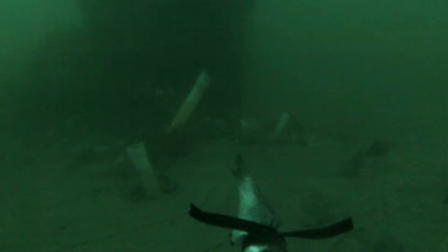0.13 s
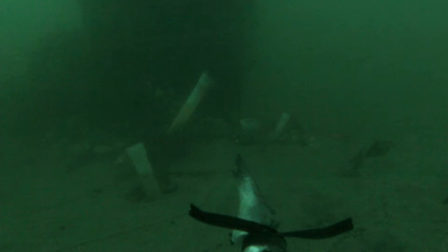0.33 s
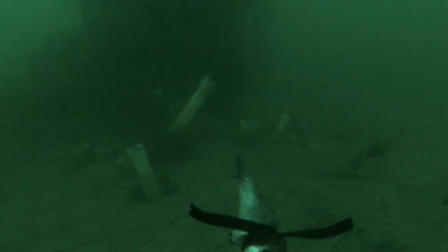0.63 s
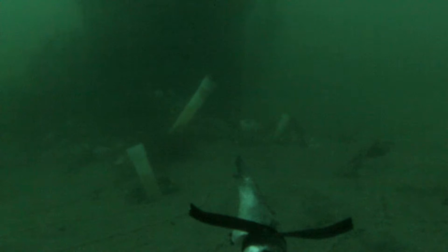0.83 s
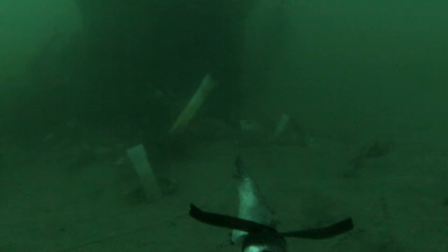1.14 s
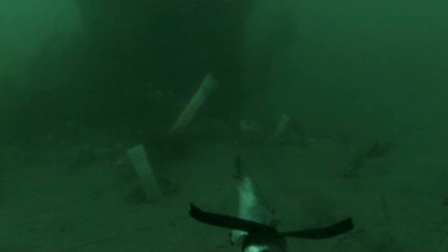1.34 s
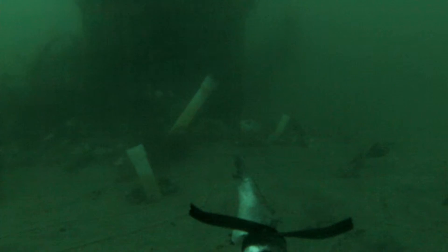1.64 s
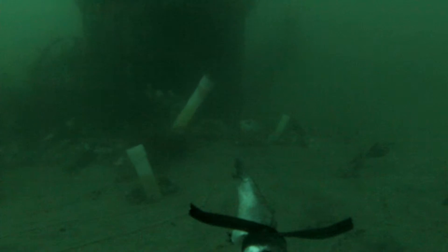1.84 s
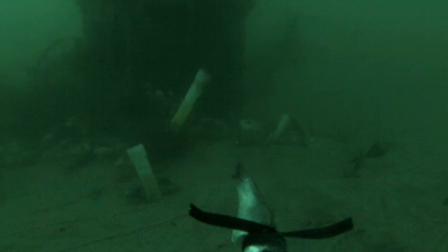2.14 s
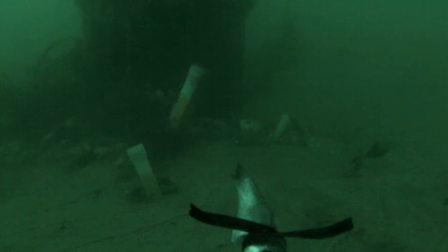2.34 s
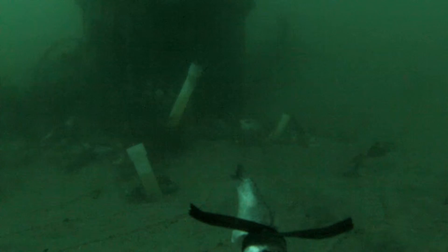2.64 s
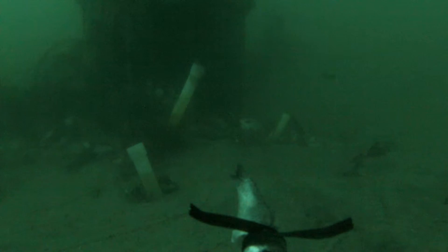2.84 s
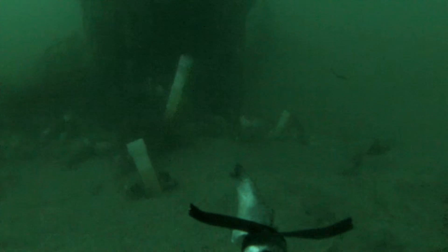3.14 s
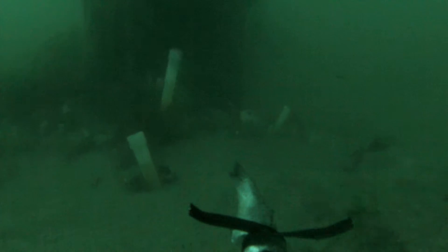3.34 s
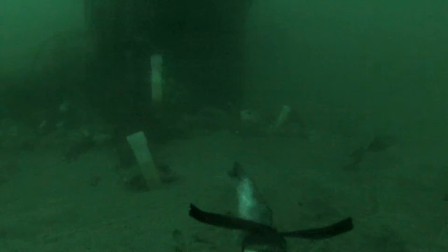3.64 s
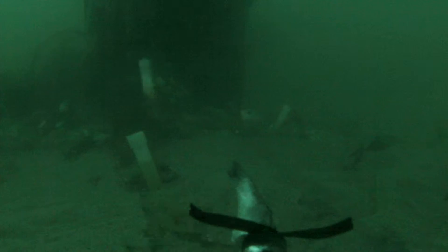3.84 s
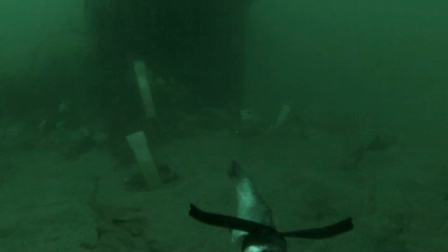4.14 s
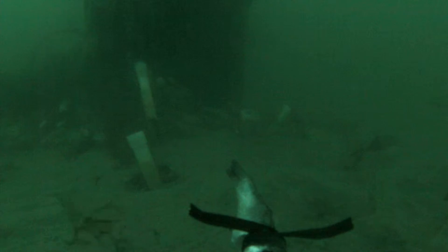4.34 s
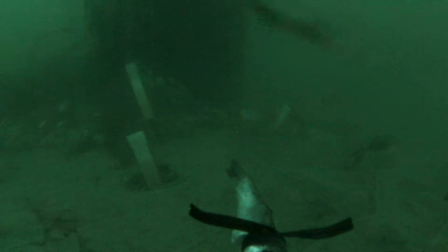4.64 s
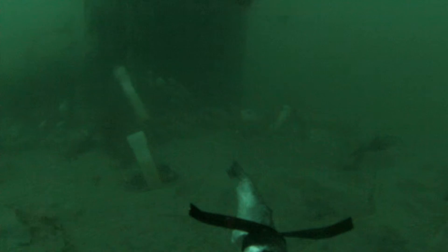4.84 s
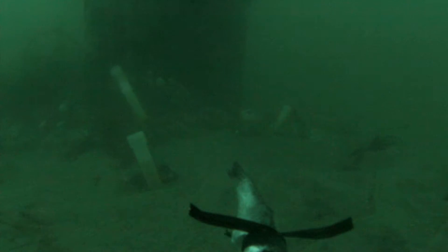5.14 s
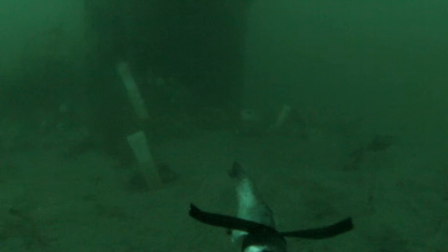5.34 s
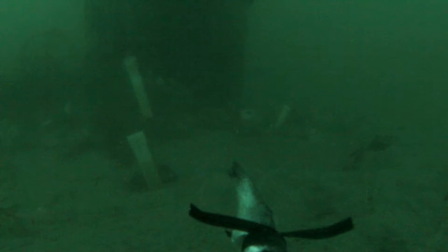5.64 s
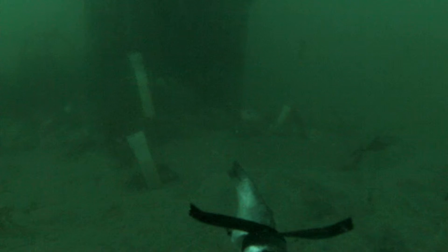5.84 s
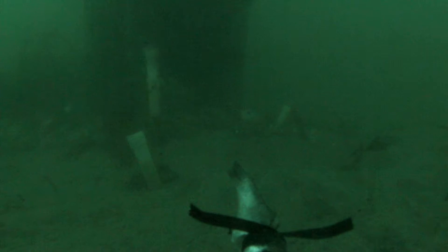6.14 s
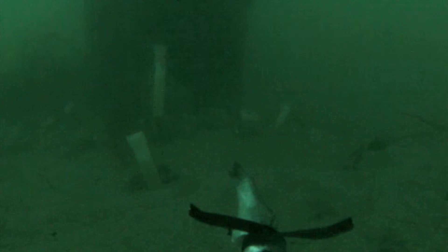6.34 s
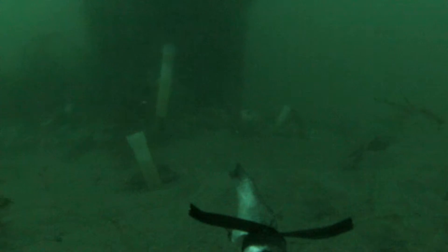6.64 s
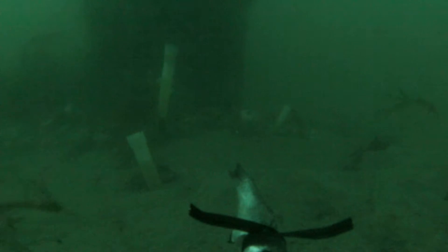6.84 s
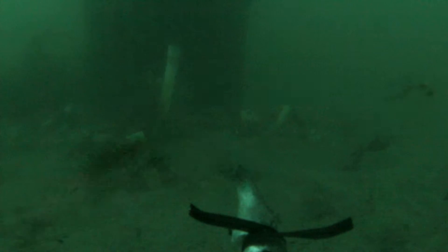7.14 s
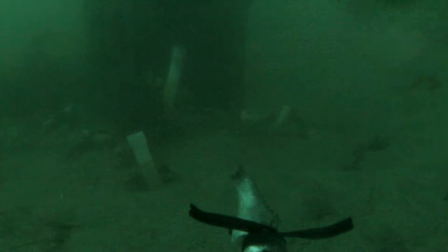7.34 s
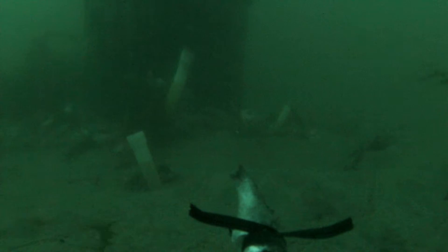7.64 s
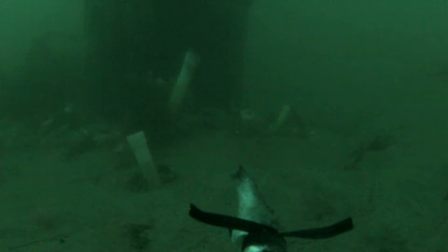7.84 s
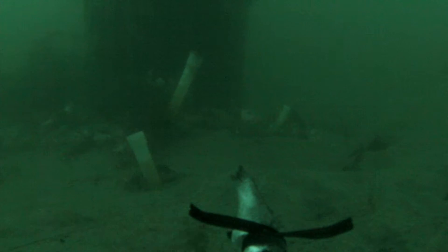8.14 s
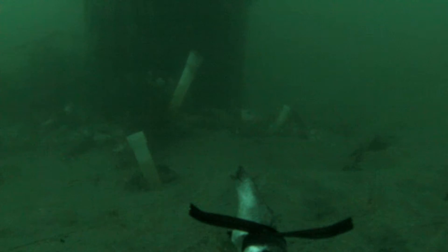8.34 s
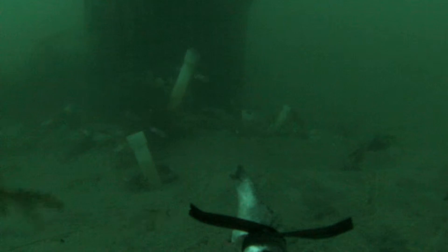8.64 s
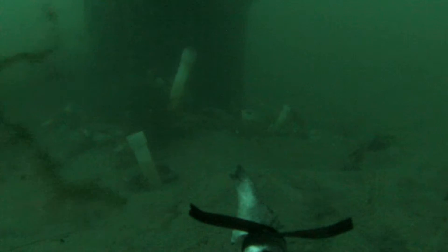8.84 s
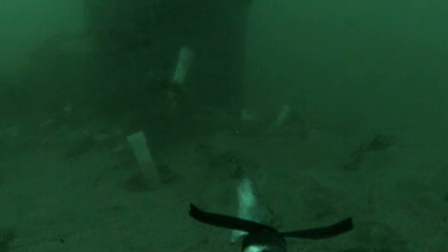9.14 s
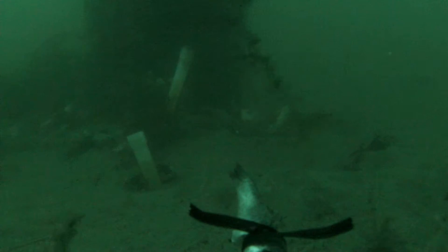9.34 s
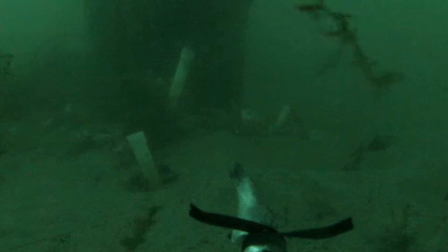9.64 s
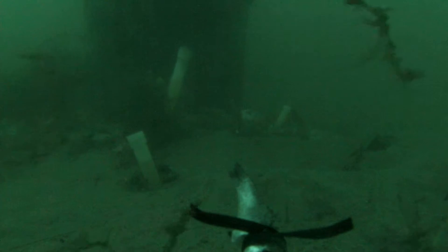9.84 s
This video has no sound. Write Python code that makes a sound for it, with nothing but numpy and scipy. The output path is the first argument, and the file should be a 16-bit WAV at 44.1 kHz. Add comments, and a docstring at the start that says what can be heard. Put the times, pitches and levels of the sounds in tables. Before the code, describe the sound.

Muffled, fluttering water surges round a pier piling beneath constant dry crackling snaps, with heavy low slaps, brief faint buzzes and occasional taps close by.

```python
"""On the sandy bed beside a pier piling, an underwater microphone (hydrophone) listens.
Water churns round the pier as a dull, throbbing rush, built from thousands of tiny pops; it swells with the surge.
Snapping shrimp crackle all around: short bursts that ring at a few pitches and trail off in echoes.
Something taps and scuffs the frame (ringing modes, puffs of noise), and the mount shudders (a wavering low tone).
A faint buzz, perhaps a fish, comes three times: a stack of harmonics. Rumble, drone and hiss lie beneath (noise)."""
import sys
import numpy as np
from scipy import signal
from scipy.fft import rfft, irfft
from scipy.io import wavfile
from scipy.ndimage import uniform_filter1d

SR = 44100
rng = np.random.default_rng(int(sys.argv[2]) if len(sys.argv) > 2 else 0)


def waveform_to_disk(signal):
    """Save audio, clipped to [-1, 1], as 16-bit WAV at the path in sys.argv[1]."""
    frames = np.transpose(np.atleast_2d(signal))
    scaled = np.clip(frames, -1, 1) * 32767
    samples = np.round(scaled).astype(np.int16)
    wavfile.write(sys.argv[1], SR, samples)


N = 440106
TIME = np.arange(N) / SR   # seconds

# Spectra and mode lists set the colour only: their levels are relative.
# colour of the broad rush and of its slaps: f/Hz, level/dB
RUSH_COLOUR = [(60, -39), (95, -22), (135, -14.5), (180, -12.5), (250, -5.5), (360, 2.5), (460, -2),
               (660, -2.5), (780, -9), (880, -18), (1000, -28), (1150, -41.5), (1500, -44), (3000, -114)]
# what a snap rings in the hydrophone: f/Hz, width/Hz, level/dB
SNAP_BODY_MODES = [(1810, 128, -9), (2145, 58, -6.5), (2560, 395, -6.5), (3084, 510, 2), (3310, 650, -1)]
# what a snap rings in the hydrophone's upper range: f/Hz, width/Hz, level/dB
SNAP_TREBLE_MODES = [(4590, 270, -4.5), (5730, 500, -4), (6400, 250, -2), (7970, 630, 0.5),
                     (10840, 850, -7), (12400, 1800, -14.5), (14700, 1200, -24)]


def water(surge_db):
    """Churning water, with separate slaps among it."""
    return churning(surge_db) + slaps(surge_db)


def churning(surge_db):
    """Countless dull pressure pops, bunched into an uneven throb, make the rush; each wave makes them boom."""
    # a hollow boom wells up with each wave: crest t/s, level/dB before trim, hold/s, fall/(dB per s)
    wave_list = [(1.33, -27, 0.11, 42), (3.27, -30, 0.26, 28), (4.87, -27.5, 0.34, 20),
                 (6.823, -29, 0.13, 9), (9.522, -28, 0.23, 80)]
    # the hollow resonance: f/Hz, level/dB
    boom_colour = [(100, -35.5), (180, -26), (228, -11.5), (246, -6), (260, 1), (278, -7), (330, -2.5),
                   (400, -16.5), (600, -43.5), (1000, -65)]
    throb_hz, throb_db = 14.5, 1.92
    boom_rest_db = -13   # between waves, against the surge level
    boom_rise_s = 0.34

    beats = np.cumsum(throb_hz * (1 + 0.2112 * drift(4.38))) / SR
    throb = from_db(throb_db * np.sin(2 * np.pi * beats) + 1.8 * drift(92))
    pops = grains(per_s=3600, spread_db=3.0, top_db=9.5) * throb

    waves = sum(from_db(db - 7.5) * swell(s, boom_rise_s, hold, fall) for s, db, hold, fall in wave_list)
    boom_level = np.hypot(waves, from_db(surge_db + boom_rest_db))
    boom = boom_level * rms_one(through(pops, pulse(boom_colour)))
    rush = from_db(surge_db + 1) * rms_one(through(pops, pulse(RUSH_COLOUR)))
    return boom + rush


def slaps(surge_db):
    """Each slap of water is one compact pulse in the colour of the rush."""
    # the heaviest slaps: t/s, level/dB before trim
    heavy_list = [(1.532, -23), (1.712, -9), (1.733, -10), (1.8385, -7), (1.864, -8.5), (1.980, -8.5),
                  (2.665, -17.5), (3.508, -8.5), (3.576, -7.5), (3.599, -6.5), (3.686, -18), (4.33, -15),
                  (4.393, -11), (4.462, -7), (4.579, -11.5), (4.642, -10), (5.421, -10), (5.503, -9),
                  (5.563, -7.5), (5.763, -7.5), (5.912, -12), (5.985, -10), (6.063, -9.5), (7.127, -8),
                  (7.291, -12.5), (7.989, -28), (9.141, -16)]
    lap_top_db = 13   # highest peak of the lighter slaps, against the surge level
    s, level_db = np.transpose(heavy_list)
    heavy = strikes(s, level_db - 7.0, delay=0.00021)
    # a negative spread makes sizes fall below the top instead of rising above a floor
    light = from_db(surge_db + lap_top_db) * grains(per_s=4, spread_db=-1.0, top_db=2)
    return through(heavy + light, pulse(RUSH_COLOUR))


def shrimp():
    """The whole colony; shallow water carries little of a snap below its cut-off."""
    body, treble = near_shrimp() + neighbour_shrimp() + far_shrimp()
    body = cut(cut(body, 1580, "high", order=14), 4890, "low", order=6)
    return body + cut(treble, 3750, "high")


def near_shrimp():
    """Loud claw snaps, some dry and some smeared by echoes, each coloured its own way: body and treble."""
    # t/s, body level/dB and treble level/dB and echo share/dB (all before trim),
    # body tilt/(dB per octave), pitch/Hz
    snap_list = [(0.063, -55, -45.5, 0, 3, 3850), (0.1454, -41.5, -48, -3, -3, 3850),
                 (0.1954, -29, -40.5, -4, 0, 2450), (0.29, -37.5, -60, -4, -8, 3600),
                 (0.304, -35, -48, -1, 0, 2950), (0.3909, -33, -41, -5, 0, 1850),
                 (0.3984, -42, -54, 7, 0, 2650), (0.4466, -36, -54, 3, -12, 2510),
                 (0.4774, -35, -53, -3, 0, 3800), (0.544, -38.5, -52, -5, 2, 3850),
                 (0.606, -39.5, -49, -5, -5, 3850), (0.6291, -25, -39.5, -18, 11, 2650),
                 (0.8338, -44.5, -42, -7, 3, 3850), (1.0113, -40.5, -56, 1, 0, 3850),
                 (1.1633, -43.5, -62, 4, -9, 3350), (1.1943, -39.5, -66, -3, -5, 3850),
                 (1.244, -59, -47, -12, -3, 3850), (1.2692, -34.5, -55, 0, 1, 3850),
                 (1.2971, -40, -58, 0, -5, 2250), (1.34, -40.5, -40.5, -4, 2, 3850),
                 (1.565, -40.5, -67, -11, 1, 2750), (1.592, -38.5, -54, -5, -6, 2250),
                 (1.62, -32, -43.5, -8, 1, 3600), (1.654, -39, -57, 7, -8, 3850),
                 (1.6854, -37.5, -51, -7, 3, 2500), (1.695, -45, -50, 11, 3, 1900),
                 (1.74, -45, -48, -14, 0, 3850), (1.8764, -46, -47, -2, 3, 3750),
                 (1.952, -39, -50, -9, 2, 2300), (2.237, -33.5, -69, -3.5, -5, 3040),
                 (2.3359, -27, -57, -6, -7, 3100), (2.4067, -41.5, -47, -11, 3, 3870),
                 (2.467, -35.5, -53, 0, -7, 2850), (2.5296, -39, -58, -3, 11, 3280),
                 (2.609, -36, -52, 0, -3, 2200), (2.6651, -44, -58, -4, 0, 2450),
                 (2.7464, -43.0, -59, -4, -11, 3050), (2.7666, -30.5, -48, -6, -7, 3050),
                 (2.7845, -33, -43, -1, -8, 2450), (2.8762, -31.5, -54, -11, -2, 3100),
                 (2.893, -41, -51, -2, -9, 2300), (3.0244, -27.5, -44, -5, -3, 3730),
                 (3.0805, -37.5, -53, 1, -6, 3300), (3.2419, -40.5, -64, -6, 3, 2650),
                 (3.2535, -46, -48, -17, 6, 3850), (3.3366, -36.5, -49, -7, -6, 3850),
                 (3.3826, -43.5, -66, -10, 6, 3250), (3.402, -46, -52, -5, 6, 2550),
                 (3.4359, -44, -53, -2, -1, 3850), (3.486, -38, -50, -10, -11, 2770),
                 (3.5148, -43.0, -65, -4, -7, 3750), (3.541, -45, -56, -2, 0, 2600),
                 (3.548, -43, -52, -7, 6, 2550), (3.5916, -26, -40, -5, -4, 3880),
                 (3.6024, -28, -45, -21, -5, 3850), (3.6412, -37, -66, -8, 2, 1900),
                 (3.928, -40, -46, -7, -10, 3850), (3.9374, -34, -42.5, -3, 1, 2060),
                 (4.125, -36.5, -50, -11, -9, 3850), (4.1642, -41, -51, -8, 0, 3800),
                 (4.1817, -36, -54, 3, -12, 3850), (4.2003, -42, -58, -2, 3, 1950),
                 (4.3192, -30.5, -46, -5, 1, 1800), (4.366, -41, -49, -9, 4, 3850),
                 (4.4183, -41, -50, -11, 3, 1900), (4.44, -49.5, -43, -20, -3, 2850),
                 (4.481, -39.5, -63, -4, 3, 3850), (4.499, -40.5, -45.5, 4, 12, 2400),
                 (4.538, -34, -62, -9, -9, 2700), (4.578, -40.5, -51, -2, -8, 3100),
                 (4.7106, -46.5, -52, -14, 0, 2900), (4.7417, -37.5, -41.5, -11, 9, 3850),
                 (4.7686, -39, -51, 1, -2, 2250), (4.796, -40.5, -44.5, 1, 6, 3850),
                 (4.8847, -40, -61, 0, -6, 2800), (4.925, -32.5, -49, -3, 1, 2000),
                 (4.955, -41, -50, -4, 9, 2550), (4.992, -36, -44, -10, 3, 3850),
                 (5.0046, -28.5, -43, -8, 0, 2210), (5.014, -48, -53, -10, -9, 3850),
                 (5.0978, -37.5, -56, -3, 0, 2600), (5.405, -44, -46, -7, 0, 2750),
                 (5.471, -36.5, -47, -5, 7, 2500), (5.545, -40.5, -45, 5, -7, 3500),
                 (5.5676, -27.5, -47, 1, -9, 2350), (5.6923, -40, -46, -7, 0, 2150),
                 (5.7262, -32.5, -46, -7, 1, 3650), (5.7987, -42.5, -59, -4, -7, 3850),
                 (6.004, -42, -57, 1, 0, 1900), (6.0314, -36.5, -53, -3, 13, 2530),
                 (6.111, -41.5, -58, -8, -5, 2350), (6.1225, -30, -36.5, -23, 0, 3100),
                 (6.1307, -39, -51, 0, 3, 3800), (6.139, -35, -52, 0, 0, 3800),
                 (6.3126, -42, -56, 1, -5, 3050), (6.4633, -35.5, -48, 2, -3, 2300),
                 (6.495, -37.5, -52, -5, -6, 2200), (6.6671, -36.5, -61, 0, -12, 2300),
                 (6.6878, -39, -53, 2, -2, 2600), (6.7677, -35.5, -41, 0, 6, 1900),
                 (6.8744, -33, -44.5, 4, -4, 3800), (7.001, -41, -68, -8, -2, 3050),
                 (7.0294, -27, -40, -11, -9, 2230), (7.0675, -45, -46, -1, 3, 2350),
                 (7.1751, -36.5, -52, -12, 8, 3680), (7.194, -47, -64, -4, 3, 2550),
                 (7.218, -40, -53, -8, 11, 3850), (7.2315, -26, -48, -12, -3, 1850),
                 (7.2538, -36, -43, -5, 6, 1850), (7.2606, -40, -55, 6, -6, 3800),
                 (7.3543, -58, -45.5, -13, 6, 2050), (7.406, -49, -55, -5, -15, 1850),
                 (7.548, -33, -55, -6, -8, 3100), (7.6654, -38.5, -60, -14, -10, 2300),
                 (7.685, -46, -47, -4, 0, 3850), (7.6926, -42, -50, -9, -3, 3850),
                 (7.7197, -45, -46, -2, -3, 3850), (7.7502, -33, -46, 5, 4, 1830),
                 (7.7736, -44, -50, -1, 9, 2050), (7.869, -39.5, -68, -6, -3, 3850),
                 (7.9478, -34, -68, -1, -5, 2850), (7.9637, -39.5, -48, -1, 0, 3700),
                 (7.978, -27.5, -33.5, -13, 7, 2750), (7.9871, -43.5, -51, 2, -5, 2150),
                 (8.027, -42, -52, 0, 5, 2750), (8.0739, -41.5, -49, 5, 0, 2700),
                 (8.219, -41.5, -57, -13, 5, 3800), (8.2378, -29.5, -46, -4, 7, 2530),
                 (8.2736, -42.0, -59, -4, 5, 2600), (8.2835, -29, -40.5, -11, -15, 2580),
                 (8.307, -37.5, -50, -6, -5, 3130), (8.3238, -38, -51, 0, -13, 2000),
                 (8.358, -48.5, -49, -2, 9, 2700), (8.5076, -53, -50, -6, 0, 3850),
                 (8.5195, -30, -46, -18, 0, 3070), (8.5733, -44.5, -59, 3, -3, 3700),
                 (8.638, -39, -39, -14, 0, 3630), (8.646, -39, -47, 2, 0, 3750),
                 (8.663, -26.5, -44, -2.5, -7, 2320), (8.8302, -43.0, -60, -4, 0, 2870),
                 (8.9814, -33, -38.5, -5, -4, 1950), (9.013, -38.5, -45, -5, 15, 2350),
                 (9.1595, -44, -55, 3, 6, 2450), (9.1778, -37, -50, -2, -9, 3450),
                 (9.216, -36.5, -49, -3, 6, 3850), (9.5225, -62.5, -50, -1, 3, 2450),
                 (9.531, -46, -40.5, -14, 5, 2450), (9.6086, -38.5, -61, 0, 8, 1950),
                 (9.629, -38.5, -69, 4, -6, 2300), (9.653, -31.5, -45, 0, 0, 3730),
                 (9.6716, -34.5, -52, 7, -3, 2750), (9.7141, -40, -61, -4, 0, 3850),
                 (9.735, -38.5, -58, 7, 3, 2100), (9.8065, -34, -50, 0, -7, 3100),
                 (9.852, -36.5, -61, -4, -15, 1790)]
    s, body_db, treble_db, scatter_db, tilt_db, pitch_hz = np.transpose(snap_list)
    scatter_db, tilt_db = scatter_db[:, None], tilt_db[:, None]
    # tilt of the treble, dB per octave
    sparkle_db = 9.5 * rng.uniform(-2.06, 0.88, (len(s), 1))
    body = impacts(s, body_db + 2.0, SNAP_BODY_MODES, vary_db=1.06, blur=0.00031,
                   echo_db=scatter_db - 1.5, t60=0.054, tilt_db=tilt_db, pitch_hz=pitch_hz, count=265)
    treble = impacts(s + .0003, treble_db + 0.67, SNAP_TREBLE_MODES, vary_db=3.0, blur=0.00052,
                     echo_db=scatter_db - 2.5, t60=0.078, tilt_db=sparkle_db, count=265)
    return np.array([body, treble])


def neighbour_shrimp():
    """Weaker snaps from a little farther off, at random moments, each with a brightness of its own."""
    faintest_body_db, faintest_treble_db = -47.5, -57.5   # treble before each snap's own brightness
    s, db = colony(spread_db=1.5, range_db=10.5, count=190)
    pitch_hz = rng.uniform(2100, 3650, len(s))
    bright_db = 4 * rng.uniform(-0.58, 1.25, len(s))
    sparkle_db = 9.5 * rng.uniform(-1, 1.7, (len(s), 1))
    body = impacts(s, faintest_body_db + db, SNAP_BODY_MODES, vary_db=1.5, blur=0.00018,
                   echo_db=-3.0, t60=0.019, pitch_hz=pitch_hz)
    treble = impacts(s, faintest_treble_db + db + bright_db, SNAP_TREBLE_MODES, vary_db=0.5, blur=0.00043,
                     echo_db=-18, t60=0.028, tilt_db=sparkle_db)
    return np.array([body, treble])


def far_shrimp():
    """Dense faint crackle and fizz, in flurries; the farthest snaps merge into a wash of ringing noise."""
    # before the flurries
    faintest_body_db, faintest_treble_db = -53, -63.5
    wash_body_db, wash_treble_db = -59.5, -70.5
    flurry_db, flurry_rate_hz = 1.4, 2.9   # spread and speed of the level's wander

    s, db = colony(spread_db=3.5, range_db=10.5, count=900)
    body = impacts(s, faintest_body_db + db, SNAP_BODY_MODES, vary_db=0.0, blur=0.00016,
                   echo_db=-4.0, t60=0.026, size=1024)
    s, db = colony(spread_db=4.5, range_db=18.0, count=1100)
    treble = impacts(s, faintest_treble_db + db, SNAP_TREBLE_MODES, vary_db=4.5, blur=0.00041,
                     echo_db=-9.0, t60=0.031, size=512)
    wash = np.array([from_db(wash_body_db) * noise_in(SNAP_BODY_MODES),
                     from_db(wash_treble_db) * noise_in(SNAP_TREBLE_MODES)])
    return (np.array([body, treble]) + wash) * from_db(flurry_db * drift(flurry_rate_hz))


def taps():
    """Light knocks on the hydrophone's frame: hard tick, short rough crack, slow bending modes, falling tail."""
    # t/s, ring level/dB and tick level/dB and echo share/dB (all before trim)
    tap_list = [(4.627, -36.5, -64, -11), (4.8232, -21.5, -47, -10), (5.1628, -25, -48, -13),
                (5.353, -25.5, -58, -9), (7.239, -14.5, -31, -7.5), (7.4126, -16, -31.5, -9.5),
                (7.9275, -11, -25, -12), (8.0038, -36.5, -54, -4)]
    # the frame's low modes: f/Hz, width/Hz, level/dB
    low_modes = [(547, 130, 3.5), (760, 110, 6.5), (934, 43, 2), (1050, 39, 1.5), (1317, 80, 11),
                 (1466, 44, 1.5), (1530, 105, 3), (1710, 350, 9), (2004, 186, 5), (2210, 65, -12),
                 (2520, 450, -2)]
    # its upper modes, which die sooner: f/Hz, width/Hz, level/dB
    mid_modes = [(2270, 460, 0), (2770, 230, -6), (3070, 120, -2), (3670, 590, -8)]
    # its treble modes: f/Hz, width/Hz, level/dB
    high_modes = [(4260, 460, -11), (5900, 240, -6.5), (7900, 300, -22), (11700, 540, -41)]
    s, ring_db, tick_db, scatter_db = np.transpose(tap_list)
    vary_db = 1.2   # how far the mode strengths differ from tap to tap
    low = impacts(s + 0.0008, ring_db - 0.5, low_modes, vary_db, blur=.00001,
                  echo_db=scatter_db[:, None] + 3.5, t60=0.041, size=4096)
    crack = impacts(s + 0.0004, ring_db - 11.5, mid_modes, vary_db, blur=0.00045, echo_db=1.5, t60=0.024)
    tick = impacts(s, tick_db + 5.0, high_modes, vary_db, blur=.0001, echo_db=-11, t60=0.0074)
    # the tail arrives unevenly
    tail = through(strikes(s, ring_db - 16.5, delay=0), chirp()) * from_db(5.5 * drift(300))
    return cut(low, 430, "high", order=2) + crack + tick + tail


def chirp():
    """Bending waves come back along the frame, the high ones first: a sine falls quickly as it dies away."""
    from_hz, to_hz, fall_s = 5200, 1340, .009
    rise_s, decay_db_per_s = 0.0068, 720
    t = TIME[:3000]
    hz = to_hz + (from_hz - to_hz) * np.exp(-t / fall_s)
    tone = np.sin(2 * np.pi * np.cumsum(hz) / SR)
    return tone * np.minimum(t / rise_s, 1) ** 2 * from_db(-decay_db_per_s * t)


def scuffs():
    """Something brushes the frame: a smooth puff of noise that dies away."""
    # crest t/s, level/dB, fall/(dB per s)
    scuff_list = [(4.25, -49.5, 114), (4.602, -54, 200)]
    # f/Hz, level/dB
    scuff_colour = [(900, -27), (1400, -11), (1720, -2), (2000, -9), (2500, -17), (5000, -46)]
    rise_s = 0.0094
    envelope = sum(from_db(db) * swell(s, rise_s, 0, fall) for s, db, fall in scuff_list)
    return envelope * coloured_noise(scuff_colour)


def buzzes():
    """A low pulse train whose pitch climbs briefly and then sags, heard mostly by its upper harmonics."""
    # start t/s, length/s, level/dB before trim, pitch/Hz before scoop and sag, sag/(Hz per s)
    buzz_list = [(2.911, 0.43, -40.5, 57.1, 14.3), (5.405, 0.46, -42, 57.55, 11.3),
                 (7.776, 0.475, -41.5, 56.6, 10.5)]
    # f/Hz, level/dB
    buzz_colour = [(200, -9.5), (500, 11), (700, 1), (850, -9), (950, -3), (1040, -9.5), (1100, -12.5),
                   (1170, -36)]
    scoop_hz, scoop_s = 1.66, 0.033   # each buzz starts this much flat and climbs
    flutter_db = 2       # the harmonics flutter
    phase_spread = 0.61  # radians; the smaller, the more sharply the buzz pulses
    fade_s = 0.058

    out = np.zeros(N)
    waver = 1 + 0.0034 * drift(9.3)
    harmonics = np.arange(4, 22)[:, None]
    flutter = np.array([drift(5.8) for _ in harmonics])
    for start, length, db, hz, sag in buzz_list:
        on = (TIME > start) & (TIME < start + length)
        t = TIME[on] - start
        pitch = (hz - scoop_hz * np.exp(-t / scoop_s) - sag * t) * waver[on]
        phase = 2 * np.pi * np.cumsum(pitch) / SR
        strengths = from_db(at_hz(buzz_colour, harmonics * pitch) + flutter_db * flutter[:, on])
        offsets = phase_spread * rng.standard_normal(harmonics.shape)
        tone = np.sum(strengths * np.sin(harmonics * phase + offsets), axis=0)
        fade = np.minimum(np.minimum(t, length - t) / fade_s, 1)
        out[on] += from_db(db + 4.5) * rms_one(tone) * fade
    return out


def shudder():
    """Jolts set the mount wobbling: a low, unsteady swing that dies away."""
    # crest t/s, level/dB, fall/(dB per s)
    jolt_list = [(.72, -53, 110), (4.248, -41, 400), (4.303, -37.5, 150), (4.408, -44, 190),
                 (4.642, -46, 190), (4.704, -48, 170), (4.83, -41.5, 380), (7.245, -49, 250),
                 (7.95, -48, 130)]
    swing_hz, wander, rise_s = 63, .09, 0.019   # wander is a share of the swing's pitch
    swing = rms_one(np.sin(2 * np.pi * np.cumsum(swing_hz * (1 + wander * drift(11.2))) / SR))
    return swing * sum(from_db(db) * swell(s, rise_s, 0, fall) for s, db, fall in jolt_list)


def current(surge_db):
    """The current rumbles over the hydrophone: low noise that partly follows the surge and swells with eddies."""
    # eddies that briefly swell the rumble: crest t/s, level/dB
    eddy_list = [(1.65, -55), (5.78, -56), (6.38, -59), (9.3, -55), (9.72, -53.5)]
    # f/Hz, level/dB
    flow_colour = [(15, -6), (35, -0.5), (60, -7.5), (100, -8), (300, -31), (1200, -52)]
    mean_db, wander_db = -60, 1.5
    follows = 0.26   # share of the surge's swing that it takes
    eddy_rise_s, eddy_fall_db_per_s = .1, 60
    flow_db = mean_db + follows * (surge_db - surge_db.mean()) + wander_db * drift(2.1)
    eddies = sum(from_db(db) * swell(s, eddy_rise_s, 0, eddy_fall_db_per_s) for s, db in eddy_list)
    return np.hypot(from_db(flow_db), eddies) * coloured_noise(flow_colour)


def background():
    """A steady far-off drone and hiss: coloured noise."""
    # f/Hz, level/dB
    floor_colour = [(50, -5), (95, -4.5), (135, 7.5), (190, 7.5), (300, 1.5), (600, -17), (1200, -16),
                    (3000, -23), (8000, -29), (15000, -34)]
    return from_db(-52.5) * coloured_noise(floor_colour)


def impacts(times, levels_db, modes, vary_db, blur, echo_db, t60,
            tilt_db=0, pitch_hz=None, size=2048, count=44):
    """Each impact rings the modes in its own way; scatter off bed, surface and pilings follows it."""
    t, out = TIME[:size], np.zeros(N + size)
    draws = rng.standard_normal((len(times), size + len(modes) + 1))
    scatter, wetness, strengths = draws[:, :size], draws[:, size:size + 1], draws[:, size + 1:]
    # the direct path is blurred over a fraction of a millisecond (blur, in s)
    direct = scatter * np.exp(-t / blur)
    # the echoes build up behind it, in uneven bunches, and lose 60 dB in t60 seconds
    lumps = np.repeat(rng.standard_normal((len(times), size // 64)), 64, axis=1)
    echoes = scatter * from_db(2.5 * lumps - 60 * t / t60) * (1 - np.exp(-t / 0.001))
    direct, echoes = (p / np.linalg.norm(p, axis=1, keepdims=True) for p in (direct, echoes))
    paths = direct + from_db(echo_db + 2.4 * wetness) * echoes

    octaves = np.log2(np.array(modes)[:, 0] / modes[0][0])
    ringing = from_db(vary_db * strengths + tilt_db * octaves) @ modes_of(modes, size)
    sounds = signal.fftconvolve(ringing, paths, axes=1)[:, :size]
    if pitch_hz is not None:
        sounds = stressed(sounds, pitch_hz)
    # levels are those of the loudest stretch of `count` samples
    loudest = np.sqrt(uniform_filter1d(sounds ** 2, size=count, axis=1).max(axis=1))
    gains = from_db(levels_db) / loudest
    starts = np.clip(np.round(times * SR).astype(int), 0, N - 1)
    for start, gain, sound in zip(starts, gains, sounds):
        out[start:start + size] += gain * sound
    return out[:N]


def modes_of(modes, size):
    """One damped sine a mode, of alternating sign; a wider mode dies sooner."""
    hz, width, db = np.transpose(modes)[:, :, None]
    t, sign = TIME[:size], (-1) ** np.arange(len(modes))[:, None]
    return sign * from_db(db) * width * np.exp(-np.pi * width * t) * np.sin(2 * np.pi * hz * t)


def stressed(sounds, pitch_hz):
    """Add to each sound a broad resonance at its own pitch."""
    gain, width_hz = 1.36, 330
    spectra = rfft(sounds, axis=1)
    hz = np.linspace(0, SR / 2, spectra.shape[1])
    resonance = gain / (1 + 2j * (hz - pitch_hz[:, None]) / width_hz)
    return irfft(spectra * (1 + resonance), axis=1)


def noise_in(modes):
    """Noise ringing in a set of modes; rms 1."""
    return rms_one(through(rng.standard_normal(N), modes_of(modes, size=8192).sum(axis=0)))


def coloured_noise(spectrum):
    """Noise shaped by a spectrum; rms 1."""
    return rms_one(through(rng.standard_normal(N), pulse(spectrum)))


def colony(spread_db, range_db, count):
    """Random moments of snaps, and how far each stands above the faintest: an exponential spread, capped."""
    when, chance = rng.random((count, 2)).T
    return when * N / SR, np.minimum(-spread_db * np.log(1 - chance), range_db)


def grains(per_s, spread_db, top_db):
    """Clicks of either sign at random moments; sizes in dB spread exponentially, up to a cap."""
    sizes = from_db(np.minimum(spread_db * rng.exponential(1, N), top_db)) * rng.choice([-1, 1], N)
    return sizes * (rng.random(N) < per_s / SR)


def strikes(times, levels_db, delay):
    """One click for each event."""
    out = np.zeros(N)
    out[np.clip(np.round((times + delay) * SR).astype(int), 0, N - 1)] = from_db(levels_db)
    return out


def swell(crest, rise, hold, fall_db_per_s):
    """An envelope that rises smoothly to its crest, holds, then dies away."""
    t = TIME - crest
    rising = np.sin(np.pi / 2 * np.clip(1 + t / rise, 0, 1)) ** 2
    return rising * from_db(-fall_db_per_s * np.maximum(t - hold, 0))


def drift(rate):
    """Smooth random wander of spread 1, slower than about `rate` Hz."""
    # made at a fortieth of the sample rate, then joined by straight lines
    r = np.exp(-80 * np.pi * rate / SR)
    slow = signal.lfilter([1], [1, -2 * r, r * r], rng.standard_normal(N // 40 + 2002))[2000:]
    return np.interp(np.arange(N) / 40, np.arange(len(slow)), rms_one(slow))


def pulse(spectrum, size=8192):
    """The most compact causal pulse that has this spectrum; peak 1."""
    # folding the cepstrum (spectrum of the log spectrum) puts the energy as early as possible
    cepstrum = irfft(np.log(from_db(at_hz(spectrum, np.arange(size // 2 + 1) * SR / size))))
    cepstrum[1:size // 2] *= 2
    cepstrum[size // 2 + 1:] = 0
    return peak_one(irfft(np.exp(rfft(cepstrum)))[:size // 2])


def through(x, response):
    """Play a signal through a response."""
    return signal.oaconvolve(x, response)[:N]


def cut(x, hz, kind, order=4):
    """Butterworth low- or high-pass."""
    return signal.sosfilt(signal.butter(order, min(hz, .45 * SR), kind, fs=SR, output="sos"), x + 1e-18)


def at_hz(points, hz):
    """Read a spectrum on a log-frequency axis."""
    point_hz, point_db = np.transpose(points)
    return np.interp(np.log(hz + 1e-9), np.log(point_hz), point_db)


def in_time(rows):
    """Each column of a curve, sample by sample."""
    s, *columns = np.transpose(rows)
    return [np.interp(TIME, s, c) for c in columns]


def from_db(db):
    """Decibels to gain."""
    return 10 ** (np.asarray(db) / 20)


def rms_one(x):
    """Scale to unit rms."""
    return x / np.sqrt(np.mean(x ** 2) + 1e-20)


def peak_one(x):
    """Scale to unit peak."""
    return x / np.max(np.abs(x))


def scene():
    """Everything meets at the one hydrophone; the surge drives both the water and the rumble."""
    # strength of the surge round the piling: t/s, level/dB
    surge_curve = [(0, -36.5), (0.3, -35.5), (0.65, -37), (1.05, -36.5), (1.3, -32.5), (1.55, -31.5),
                   (1.85, -32), (2.1, -34.5), (2.5, -40.5), (2.68, -35.5), (2.85, -35), (3.05, -36),
                   (3.35, -35.5), (3.6, -32.5), (3.97, -34), (4.4, -33), (4.75, -34), (5.3, -34.5),
                   (5.6, -31.5), (5.9, -33.5), (6.25, -37), (6.55, -36.5), (6.85, -32), (7.15, -33),
                   (7.68, -35.5), (7.92, -33), (8.35, -32.5), (9.1, -34.5), (9.45, -32.5), (9.8, -33),
                   (9.98, -36)]
    surge_db, = in_time(surge_curve)
    mix = water(surge_db) + shrimp() + taps() + scuffs() + buzzes()
    mix = mix + shudder() + current(surge_db) + background()
    return mix[None]


def record(dry):
    """The top is cut steeply at 15600 Hz by an elliptic low-pass."""
    return signal.sosfilt(signal.ellip(10, .2, 90, 15600, fs=SR, output="sos"), dry)


dry = scene()
out = record(dry)
waveform_to_disk(out)
```